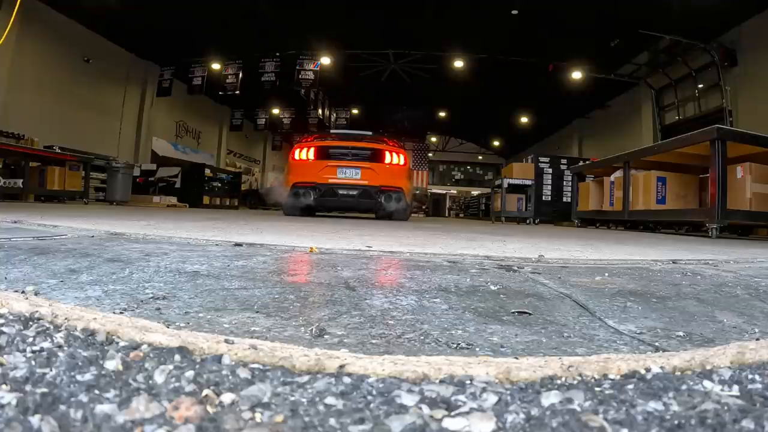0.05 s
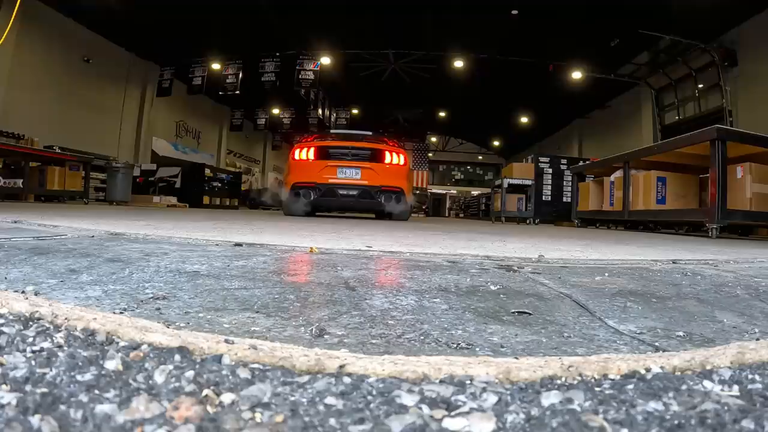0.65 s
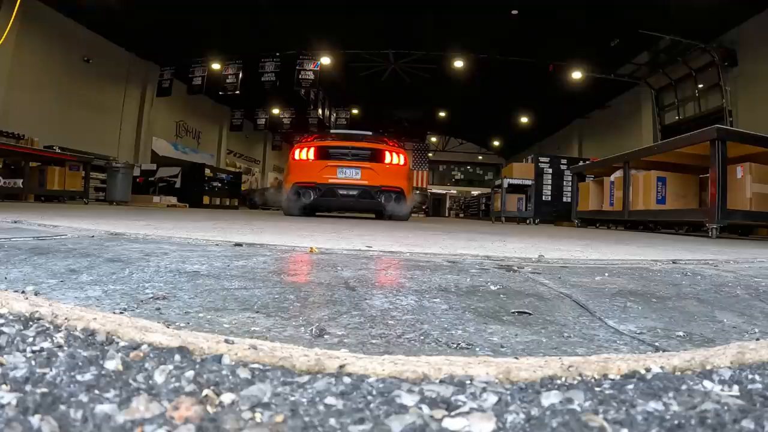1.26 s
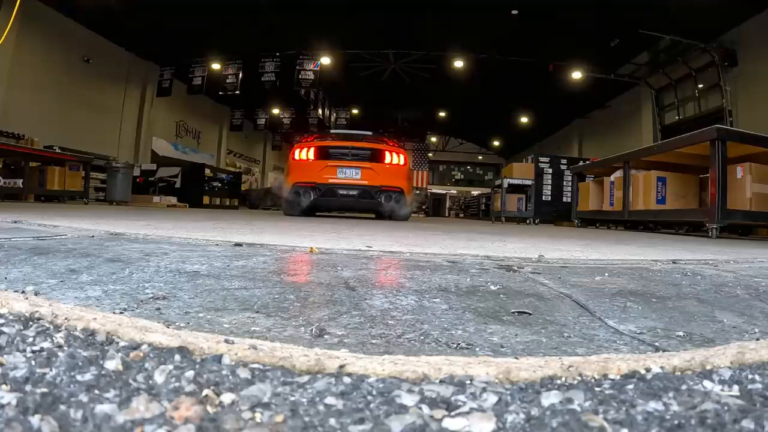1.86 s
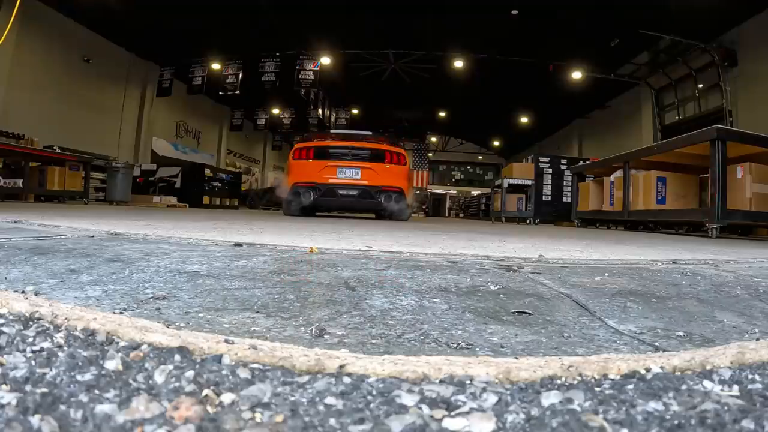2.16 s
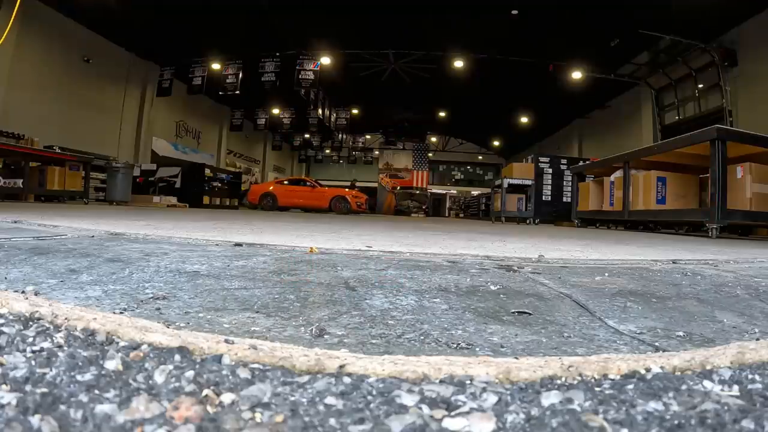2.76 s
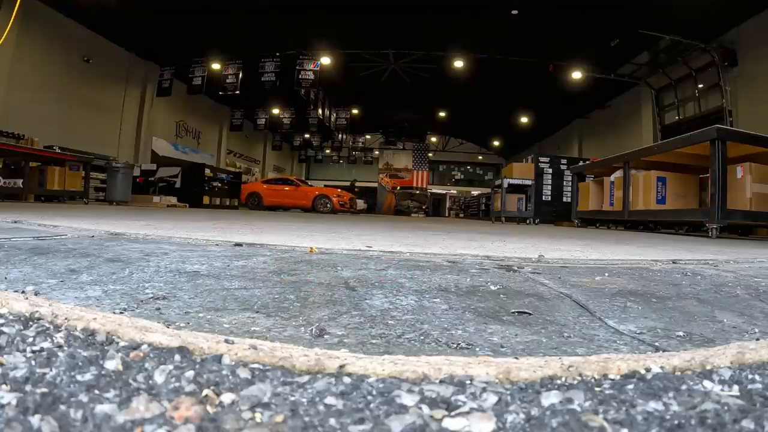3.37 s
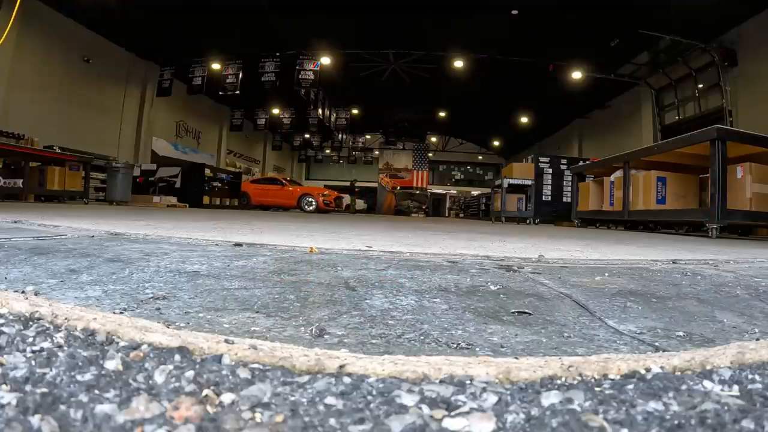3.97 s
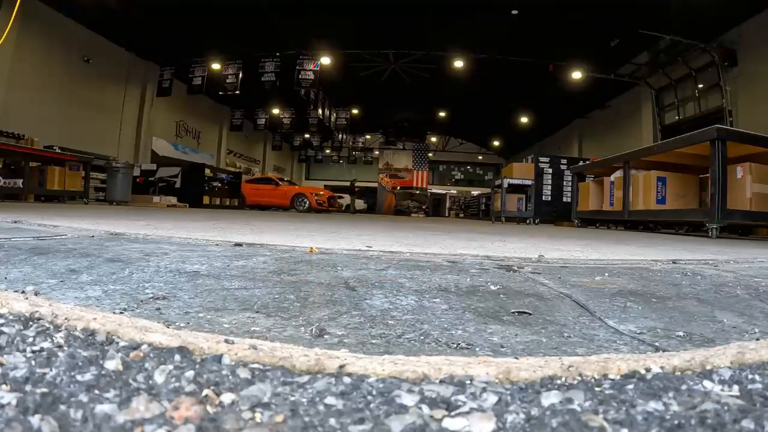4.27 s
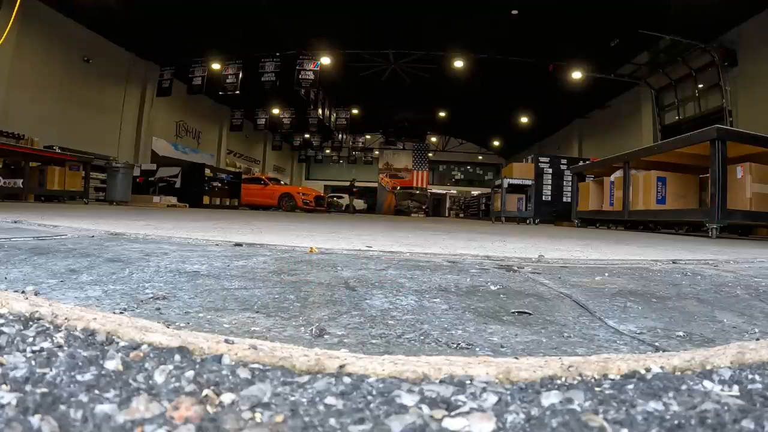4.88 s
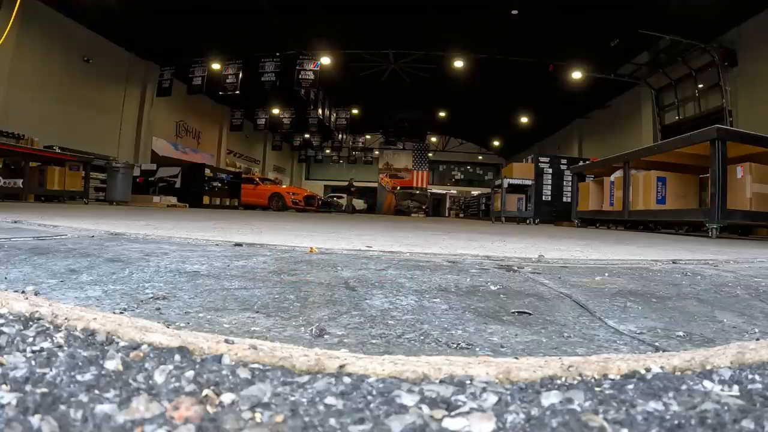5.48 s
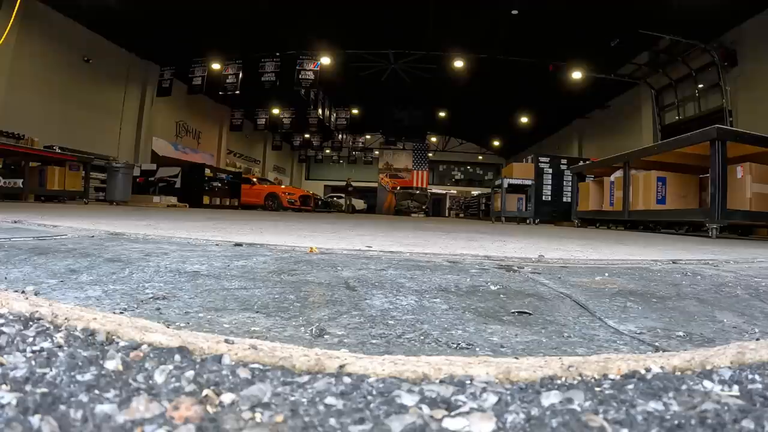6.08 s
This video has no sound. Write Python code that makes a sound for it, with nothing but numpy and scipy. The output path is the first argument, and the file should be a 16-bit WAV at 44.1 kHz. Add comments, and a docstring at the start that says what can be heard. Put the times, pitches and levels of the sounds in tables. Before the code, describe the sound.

Close exhaust pulses and pops from a powerful car give way to distant, echoing engine rumble and faintly squealing tyres.

```python
"""A big V8 car lopes at fast idle in a large workshop hall. First the tailpipes are close: each firing
sends a pressure pulse, a puff of gas and a metallic rasp out of the pipes while the revs settle.
At 2.4 s the scene changes with a click to the car creeping far down the hall: echoes blur the firings
into a rumble, and the tyres stick and slip in soft squeals. At 4.75 s grit cracks under a tyre;
then the revs sag."""
import sys
import numpy as np
from scipy import signal
from scipy.fft import rfft, irfft
from scipy.io import wavfile
from scipy.ndimage import uniform_filter1d, minimum_filter1d

SR = 44100
rng = np.random.default_rng(int(sys.argv[2]) if len(sys.argv) > 2 else 0)


def log_audio(samples):
    """Write samples as a 16-bit WAV file to the path given in sys.argv[1]."""
    # one column per channel
    frames = np.atleast_2d(samples).T
    # limit to full scale, then quantise
    limited = np.clip(frames, -1, 1)
    pcm = np.round(limited * 32767).astype(np.int16)
    wavfile.write(sys.argv[1], SR, pcm)


N = 274743
T = np.arange(N) / SR
FAR_START_S = 2.426


def exhaust(count, pipe, rough, scatter_db, gust_firings):
    """A pressure pulse at every firing, then a dying gust of turbulence, both through the pipes."""
    pulses = np.diff(np.floor(count), prepend=np.floor(count[0]))
    gusts = np.exp(-(count % 1) / gust_firings) * rng.standard_normal(N)
    pressure = blows(count, THUMP, scatter_db) * (unit_rms(pulses) + rough * unit_rms(gusts))
    return unit_rms(colour(pressure, pipe))


# Cylinders in firing order. Each row: thump in dB, gas puff in dB.
CYLINDERS = [(3.5, 5), (2, 1.5), (5, 2), (0, 5), (-7, -3), (-2.5, 2), (5, 1), (0.5, 3.5)]
THUMP, PUFF = 0, 1

def blows(count, column, scatter_db):
    """Strength of the latest firing: its cylinder's own, plus scatter."""
    index = np.floor(count).astype(int)
    scatter = rng.standard_normal(1024)[index % 1024]
    return gain_of(np.array(CYLINDERS)[index % len(CYLINDERS), column] + scatter_db * scatter)


# Engine speed. Each row: time in seconds, firings per second.
NEAR_SPEED = [(0.0, 74.97), (0.25, 72.52), (0.74, 66.21), (1.21, 61.85), (1.66, 61.65), (2.16, 63.85),
              (2.42, 64.15)]
# Firing note in the hall's standing waves. Each row: time in seconds, level in dB.
NEAR_NOTE = [(0.0, -18.5), (0.7, -18.5), (0.79, -29), (0.88, -17), (1.08, -18), (1.22, -36), (1.3, -21),
             (1.9, -21), (2.03, -25), (2.42, -20)]
# Booming orders. Each row: crank order, level in dB.
NEAR_BOOM_ORDERS = [(7, -19), (7.5, -17.5), (8, -11)]
# Boom resonance, pipe and rumble spectra. Each row: frequency in Hz, gain in dB.
NEAR_BOOM_RESPONSE = [(110, -67), (116, -7), (120, -7), (123.5, 2.5), (128, 1), (133, -3), (141, -4.5),
                      (150, -4.5)]
NEAR_PIPE = [(40, -19), (100, 1.5), (150, -2), (225, -11), (320, -9.5), (450, 0.5), (560, -4.5), (700, -6),
             (1170, -7.5), (1350, -15), (1900, -19.5), (2300, -21.5), (2600, -34), (3600, -46),
             (15000, -100)]
NEAR_RUMBLE = [(10, -42), (25, -1), (55, 42), (90, -15), (150, -1), (220, -2), (400, -53)]
# Pipe and hall resonances. Each row: centre in Hz, width in Hz, gain in dB.
NEAR_MODES = [(213, 21, -4), (266, 23, -2), (336, 26, 6), (451, 32, -2), (579, 33, 12.5), (620, 28, -11),
              (690, 14, -13), (819, 37, -4), (875, 16, 1), (2120, 180, -0.5), (2750, 62, 5)]

def near_car():
    """Close tailpipes: boom, throbbing exhaust and a sharp puff of gas at every firing."""
    count = firings(NEAR_SPEED, start_s=0)
    note = gain_of(2) * firing_note(count + .41, [NEAR_NOTE], waver=.02)
    boom = gain_of(-2.5) * booming(count, NEAR_BOOM_ORDERS, NEAR_BOOM_RESPONSE, waver=.056, spread=5.4)
    lines = gain_of(2.2) * near_lines(count)
    rumble = gain_of(-36.5) * noise(NEAR_RUMBLE)
    pipes = exhaust(count - .52, NEAR_PIPE, rough=1, scatter_db=1.3, gust_firings=.93)
    pipes = gain_of(rev_level_db(count, -16.5, db_per_hz=.033)) * unit_rms(ring(pipes, NEAR_MODES))
    roar = gain_of(-9) * hall(pipes, t60_s=.97, wet_db=1)
    gas_gain = gain_of(rev_level_db(count, -43, db_per_hz=-.051))
    mid = note + boom + lines + roar + pops() + rumble + rasp(count) + gas_gain * puffs(count)
    echoes = hall(pipes, t60_s=.42, wet_db=-6.5) - pipes
    return stereo(mid, echoes + gas_gain * puffs(count) + gain_of(-7) * rasp(count))


# Engine speed. Each row: time in seconds, firings per second.
FAR_SPEED = [(2.42, 79.23), (2.7, 77.15), (3.09, 76.83), (3.59, 78.47), (3.89, 77.65), (4.33, 77.44),
             (4.71, 78.98), (4.93, 77.23), (5.47, 65.72), (5.82, 61.66), (6.23, 60.47)]
# Firing note and its octave. Each row: time in seconds, level in dB.
FAR_NOTE = [(2.42, -10), (2.6, -13), (2.74, -35), (3.12, -20.5), (3.39, -28.5), (3.74, -18), (4.11, -24.5),
            (4.76, -14), (5.01, -26), (5.18, -12.5), (5.69, -13.5), (6.0, -27), (6.23, -18)]
FAR_OCTAVE = [(2.42, -27), (2.75, -19.5), (3.9, -21.5), (4.63, -25.5), (4.85, -39), (5.12, -19),
              (5.45, -16), (5.6, -16.5), (6.23, -22.5)]
# Booming orders. Each row: crank order, level in dB.
FAR_BOOM_ORDERS = [(7, -23), (7.5, -23)]
# Boom resonance, pipe and rumble spectra. Each row: frequency in Hz, gain in dB.
FAR_BOOM_RESPONSE = [(112, -9.5), (122, -8), (132, 4.5), (140, -6.5), (148, 2)]
FAR_PIPE = [(40, -20), (100, 1), (145, 1.5), (195, -2.5), (250, 0.5), (310, 3), (410, -0.5), (540, -4.5),
            (640, -5.5), (800, -10), (1100, -12.5), (1400, -16.5), (2100, -32), (3000, -50), (15000, -100)]
FAR_RUMBLE = [(10, -16), (22, -18), (35, 3), (52, 3), (75, 2), (130, -31.5), (400, -82)]
# Pipe and hall resonances. Each row: centre in Hz, width in Hz, gain in dB.
FAR_MODES = [(338, 11, -8.5), (373, 84, -14.5), (433, 12, -0.5), (502, 84, -9), (530, 14, -19)]

def far_car():
    """Far down the hall echoes blur the firings; tyre hiss and squeal lie on top."""
    count = firings(FAR_SPEED, FAR_START_S)
    exhaust_db = rev_level_db(count, -21.5, db_per_hz=.2)
    swing_db = 1.04 * bump(middle_s=3.4, length_s=1.7)  # the car swings round
    load_db = exhaust_db - exhaust_db[T > FAR_START_S].mean() + swing_db
    note = gain_of(-.06) * firing_note(count, [FAR_NOTE, FAR_OCTAVE], waver=.06)
    boom = gain_of(-1.8) * booming(count, FAR_BOOM_ORDERS, FAR_BOOM_RESPONSE, waver=.07, spread=1.5)
    lines = gain_of(load_db - 1.5) * far_lines(count)
    pipes = ring(exhaust(count - .4, FAR_PIPE, rough=2.42, scatter_db=.25, gust_firings=.79), FAR_MODES)
    rumble = gain_of(-27) * noise(FAR_RUMBLE)

    def wash():
        """A fresh diffuse mix of exhaust echoes and tyres."""
        roar = gain_of(exhaust_db) * unit_rms(hall(pipes, t60_s=1.57, wet_db=6.5))
        return roar + tyre_hiss(count) + tyre_squeal()
    return stereo(note + boom + lines + singing(count) + rumble + wash(), gain_of(-1) * wash())


def firing_note(count, tables, waver):
    """The firing rate (crank order 4) and its multiples, each on its level curve."""
    orders = 4 * np.arange(1, len(tables) + 1)
    return drone(count, orders, [curve(rows) for rows in tables], waver, np.zeros(len(orders)))


def booming(count, table, response, waver, spread):
    """Low orders boom as they slide into a resonance; spread phases (radians) soften the beat."""
    orders, own_db = np.transpose(table)
    rate_hz = firing_hz(count)
    levels_db = [db + np.interp(k * rate_hz / 4, *np.transpose(response)) for k, db in table]
    return drone(count, orders, levels_db, waver, spread * (orders - 8) ** 2)


# Exhaust lines. Each row: crank order, idle level in dB, raised-rev level in dB.
NEAR_ORDERS = [(3.0, -45.0, -26.0), (3.5, -37.0, -40.0), (4.5, -37.0, -33.0), (5.0, -38.0, -30.0),
               (6.5, -46.0, -37.0), (8.5, -40.0, -33.0), (9.0, -33.0, -29.0), (9.5, -31.0, -36.0),
               (10.0, -34.0, -48.0), (10.5, -38.0, -32.0), (11.0, -44.0, -28.0), (11.5, -39.0, -33.0),
               (12.0, -30.0, -31.0), (12.5, -45.0, -37.0), (13.0, -38.0, -43.0), (13.5, -42.0, -32.0),
               (14.0, -37.0, -31.0), (14.5, -51.0, -33.0), (15.0, -43.0, -35.0), (15.5, -33.0, -39.0),
               (16.0, -28.0, -29.0), (16.5, -42.0, -41.0), (17.0, -43.0, -33.0), (17.5, -44.0, -37.0),
               (18.0, -40.0, -38.0), (18.5, -40.0, -28.0), (19.0, -35.0, -28.0), (19.5, -37.0, -35.0),
               (20.0, -25.0, -26.0), (20.5, -36.0, -36.0), (21.0, -36.0, -36.0), (21.5, -37.0, -42.0),
               (22.0, -37.0, -31.0), (22.5, -32.0, -38.0), (23.0, -42.0, -28.0), (23.5, -34.0, -34.0),
               (24.0, -30.0, -31.0), (24.5, -41.0, -30.0), (25.0, -47.0, -31.0), (25.5, -43.0, -29.0),
               (26.0, -36.0, -33.0), (26.5, -37.0, -29.0), (27.0, -36.0, -43.0), (27.5, -29.0, -36.0),
               (28.0, -40.0, -37.0), (28.5, -29.0, -38.0), (29.0, -34.0, -43.0), (29.5, -44.0, -38.0),
               (30.0, -41.0, -36.0), (30.5, -40.0, -37.0), (31.0, -35.0, -38.0), (31.5, -37.0, -44.0),
               (32.0, -37.0, -40.0), (32.5, -39.0, -40.0), (35.0, -40.0, -47.0), (35.5, -34.0, -41.0),
               (36.0, -32.0, -46.0), (37.0, -37.0, -45.0), (37.5, -50.0, -41.0), (38.5, -43.0, -46.0),
               (39.0, -42.0, -46.0), (39.5, -38.0, -49.0), (40.0, -38.0, -45.0), (40.5, -51.0, -41.0),
               (41.5, -51.0, -40.0), (42.5, -42.0, -44.0), (43.0, -48.0, -44.0), (43.5, -41.0, -48.0),
               (45.0, -53.0, -43.0), (45.5, -55.0, -44.0), (46.5, -45.0, -52.0), (49.0, -46.0, -54.0),
               (51.5, -43.0, -52.0), (53.0, -45.0, -49.0)]

def near_lines(count, steady_hz=62.2, blend_hz=(63, 69), growth_db_per_hz=.7, growth_top_hz=64):
    """Firm exhaust drone: the same crests every engine cycle, changing colour with the revs."""
    orders, idle_db, raised_db = np.transpose(NEAR_ORDERS)
    rate_hz = firing_hz(count)
    revved = np.interp(rate_hz, blend_hz, [0, 1])
    growth_db = growth_db_per_hz * (np.minimum(rate_hz, growth_top_hz) - steady_hz)
    idling_db = sliding_db(rate_hz, orders, idle_db, NEAR_PIPE, NEAR_MODES, steady_hz)
    levels_db = ((1 - revved) * (idle + growth_db) + revved * raised
                 for idle, raised in zip(idling_db, raised_db))
    return drone(count, orders, levels_db, waver=.07, phases=lope(orders, (idle_db + raised_db) / 2))


def lope(orders, line_db, throb=.45, crest_firings=.11, crest_floor=.45):
    """Phases that gather the orders into two pressure crests a firing, higher on strong cylinders."""
    count = np.arange(1024) / 128 + PHASE_ORIGIN_FIRINGS  # one engine cycle
    crests = np.exp(-(((count - 2.45) % .5 - .25) / crest_firings) ** 2)
    envelope = (crest_floor + crests) * blows(count - .5, THUMP, scatter_db=0) ** throb
    bins, lines = np.rint(2 * orders).astype(int), np.zeros(513, complex)
    cycle = envelope * crests ** 4 + .3 * rng.standard_normal(len(count))
    for _ in range(30):  # impose line levels and envelope in turn
        phases = np.angle(rfft(cycle)[bins])
        lines[bins] = gain_of(line_db) * np.exp(1j * phases)
        cycle = envelope * np.cos(np.angle(signal.hilbert(irfft(lines))))
    return phases


# Exhaust lines. Each row: crank order, level in dB.
FAR_ORDERS = [(2, -35), (2.5, -33), (3, -38), (3.5, -36), (5, -34), (5.5, -38), (6, -38), (6.5, -37),
              (9, -40), (10.5, -35), (11, -37), (12, -39), (12.5, -29), (13, -38), (13.5, -28), (14, -32.5),
              (14.5, -35), (15, -35), (15.5, -36), (17, -37), (18, -36), (18.5, -33.5), (19, -38),
              (20, -38), (20.5, -37), (21, -33.5), (22, -38), (23, -35.5), (24, -40), (25, -39),
              (25.5, -36), (26, -40), (27, -39), (28, -36), (30, -42), (34, -42)]

def far_lines(count, steady_hz=77.8):
    """Distant exhaust drone; echoes smear it while the revs change."""
    orders, line_db = np.transpose(FAR_ORDERS)
    rate_hz = firing_hz(count)
    glide_hz_per_s = abs(np.gradient(uniform_filter1d(rate_hz, SR // 4))) * SR
    smear = .042 * glide_hz_per_s
    levels_db = sliding_db(rate_hz, orders, line_db, FAR_PIPE, FAR_MODES, steady_hz)
    return drone(count, orders, levels_db, waver=.13 + smear) / (1 + smear)


def sliding_db(rate_hz, orders, line_db, pipe, modes, steady_hz):
    """Orders swell and fade as they slide through the pipe's resonances."""
    f = np.arange(1500.)
    ringing = 1 + sum(gain_of(db) / (1 + 2j * (f - hz) / width) for hz, width, db in modes)
    pipe_db = np.interp(f, *np.transpose(pipe)) + 20 * np.log10(abs(ringing))
    return (db + np.interp(k * rate_hz / 4, f, pipe_db) - np.interp(k * steady_hz / 4, f, pipe_db)
            for k, db in zip(orders, line_db))


# Swells, keyed by crank order. Each row: middle in seconds, length in seconds, level in dB.
SINGING_ORDERS = {2.5: [(3.05, .7, -26)], 8.5: [(5.45, .25, -24)], 9: [(5.95, .5, -31)],
                  13: [(4.92, .3, -27)], 14.5: [(5.25, .3, -25)], 15.5: [(5.5, .2, -26)],
                  16: [(2.62, .3, -23), (3.3, .65, -23), (4.27, .5, -22), (5.18, .25, -29)],
                  17.5: [(3.55, .25, -27), (4.05, .7, -20), (4.68, .2, -26)], 19.5: [(2.7, .3, -27),
                  (3.3, .35, -26), (4.65, .3, -25)], 20: [(5.82, .3, -24)], 20.5: [(4.66, .38, -22.5)],
                  21: [(2.68, .25, -26), (3.95, .3, -29), (6.0, .4, -34)], 22.5: [(3.58, .2, -24),
                  (4.25, .4, -23.5)], 28.5: [(5.48, .18, -23), (5.85, .3, -29)], 32.5: [(5.85, .35, -31)],
                  35.5: [(6.1, .35, -30)]}

def singing(count):
    """Single orders sing out as the car creeps through the hall's standing waves."""
    orders = sorted(SINGING_ORDERS)
    levels_db = [20 * np.log10(swells(SINGING_ORDERS[k]) + 1e-6) for k in orders]
    return drone(count, orders, levels_db, waver=.08)


PHASE_ORIGIN_FIRINGS = 2.7

def drone(count, orders, levels_db, waver, phases=None):
    """Wavering crank orders; by default loosely in step with the strongest cylinder."""
    turns = (count - PHASE_ORIGIN_FIRINGS) / 4
    knots_s = np.arange(0, T[-1] + .1, .1)
    if phases is None:
        phases = rng.uniform(-2.3, 2.3, len(orders))
    out = np.zeros(N)
    for order, db, phase in zip(orders, levels_db, phases):
        swell, drift = (waver * np.interp(T, knots_s, v) for v in rng.standard_normal((2, len(knots_s))))
        out += gain_of(db) * (1 + swell) * np.cos(2 * np.pi * order * turns + 2 * drift + phase)
    return np.sqrt(2) * out


# Hard thumps. Each row: start in seconds, peak in dB.
POPS = [(.0815, -8), (.148, -12), (.296, -12), (.412, -17), (.474, -13), (.5945, -6), (.7135, -6),
        (.8345, -6), (.896, -11), (.9575, -7), (1.0845, -14), (2.1105, -14), (2.238, -14), (2.363, -14)]
# Thump spectrum. Each row: frequency in Hz, gain in dB.
POP_COLOUR = [(100, -25), (250, -7), (450, -1), (850, -4), (1150, -9), (1400, -22), (2200, -29),
              (3500, -46), (15000, -100)]

def pops():
    """Some firings crack harder out of the tailpipes: one short pressure pulse each."""
    kicks = np.zeros(N)
    for start_s, db in POPS:
        kicks[round(start_s * SR)] = gain_of(db)
    return colour(kicks, POP_COLOUR) / colour(1. * (T == 0), POP_COLOUR).max()


# Gas hiss spectrum. Each row: frequency in Hz, gain in dB.
PUFF_COLOUR = [(1500, -4), (3000, 0), (4200, -1), (5700, -3), (7300, -8), (9600, -7), (12300, -14),
               (13500, -27), (15000, -43)]

def puffs(count, lag_firings=.58):
    """Gas hisses out at every firing; a weaker reflection follows, over a steady hiss."""
    age = (count - lag_firings) % 1
    strength = blows(count - lag_firings, PUFF, scatter_db=2)
    puff = strength * (1 - np.exp(-age / .064)) * np.exp(-age / .15)
    reflection = .37 * np.roll(puff, round(.0054 * SR))
    envelope = np.sqrt(puff ** 2 + reflection ** 2 + .14 ** 2)
    return noise(PUFF_COLOUR, envelope)


# Tailpipe rasp and its harder spits. Each row: time in seconds, level in dB.
RASP_LEVEL = [(0, -41.5), (.3, -39), (.75, -39), (1.2, -45.5), (1.38, -39), (1.75, -39.5), (2.1, -40),
              (2.4, -34.5)]
SPITS = [(.266, -33), (.417, -32), (1.357, -33), (1.481, -33), (1.612, -27), (1.632, -34), (1.997, -26),
         (2.317, -34)]
# Rasp spectrum. Each row: frequency in Hz, gain in dB.
RASP_COLOUR = [(1100, -22.5), (1500, -5.5), (1900, -1), (2200, 0.5), (2480, -11.5), (2750, -2.5),
               (3100, -25), (6000, -37)]

def rasp(count, lag_firings=.475, spit_decay_s=.013):
    """A metallic rasp rides on every firing and sometimes spits harder."""
    age = (count - lag_firings) % 1
    strength = blows(count - lag_firings, PUFF, scatter_db=1.2)
    bursts = strength * (1 - np.exp(-age / .014)) * np.exp(-age / .6)
    buzz = gain_of(curve(RASP_LEVEL)) * unit_rms(bursts)
    spits = sum(gain_of(db) * decay(start_s, spit_decay_s) for start_s, db in SPITS)
    return np.hypot(buzz, spits) * noise(RASP_COLOUR)


# Squeals. Each row: middle in seconds, length in seconds, level in dB.
SQUEALS = [(2.513, 0.53, -28), (3.262, 0.094, -29), (3.547, 0.37, -30.5), (3.964, 0.082, -32),
           (4.74, 0.22, -33.5), (5.345, 0.19, -30.5), (5.593, 0.31, -31.5)]
# Tyre whine spectrum. Each row: frequency in Hz, gain in dB.
WHINE = [(600, -60.5), (860, 6), (950, 6), (1020, 0), (1120, 4), (1250, -38), (1700, -51)]

def tyre_squeal(pitch_hz=960, scrub_db=-31):
    """Turning rubber sticks and slips on the smooth floor: a noisy whine and a hall-smeared note."""
    squeal = swells(SQUEALS)
    whine = np.hypot(gain_of(scrub_db), squeal) * gain_of(-2.9 + .46 * wander(11)) * noise(WHINE)
    hz = pitch_hz * (1 + .03 * wander(12.5))
    note = hall(np.sin(2 * np.pi * np.cumsum(hz) / SR), t60_s=.75, wet_db=-6)
    return whine + gain_of(-3.5) * squeal * unit_rms(note)


# Tyre hiss spectrum. Each row: frequency in Hz, gain in dB.
TYRE_HISS = [(1000, 0.5), (2000, 7), (2900, -0.5), (3600, -0.5), (5000, -3), (7000, -8.5), (9000, -16.5),
             (12000, -22), (13500, -39), (15000, -57)]
# Hall resonances. Each row: centre in Hz, width in Hz, gain in dB.
HISS_MODES = [(3530, 31, 0.5), (3970, 150, -7)]
# Hiss spurts. Each row: middle in seconds, length in seconds, rise in dB.
SPURTS = [(3.335, 0.044, 4), (3.552, 0.44, 1)]

def tyre_hiss(count):
    """Tyre hiss follows the revs, swells as the car swings round and rings in the hall."""
    swing_db = 4 * bump(middle_s=2.62, length_s=.23)
    spurts_db = sum(db * bump(middle_s, length_s) for middle_s, length_s, db in SPURTS)
    level_db = rev_level_db(count, -40, db_per_hz=.21) + swing_db + spurts_db
    return gain_of(level_db) * unit_rms(ring(noise(TYRE_HISS), HISS_MODES))


# Grit snaps. Each row: start in seconds, level in dB.
SNAPS = [(4.7512, -26), (4.7624, -18), (4.7678, -20), (4.769, -10.5), (4.772, -13), (4.7741, -21),
         (4.7771, -19), (4.779, -24), (4.8058, -22)]
# Snap spectrum. Each row: frequency in Hz, gain in dB.
GRIT = [(500, 3), (1500, 9), (2100, 10), (3000, 8.5), (4700, 9), (8000, -1.5), (12500, -21), (14500, -51)]

def grit():
    """A stone cracks under the rolling tyre in a quick run of snaps."""
    snaps = np.zeros(N)
    for start_s, db in SNAPS:
        snap = noise(GRIT, decay(start_s, decay_s=.0009))
        snaps += gain_of(db) * snap / abs(snap).max()
    return stereo(hall(snaps, t60_s=.39, wet_db=-7), hall(snaps, t60_s=.6, wet_db=-8) - snaps)


def hall(x, t60_s, wet_db):
    """Direct sound plus a dense tail of echoes."""
    t = T[:SR]
    tail = rng.standard_normal(SR) * (rng.random(SR) < .05) * gain_of(-60 * t / t60_s) * (t > .004)
    return x + gain_of(wet_db) * signal.oaconvolve(x, tail / np.linalg.norm(tail))[:N]


# Side signal spectrum. Each row: frequency in Hz, gain in dB.
SPREAD = [(60, -18), (200, -31.5), (380, -22.5), (700, -14), (1300, -13), (2400, -6), (4400, -9),
          (8000, -6.5), (15000, -4)]

def stereo(mid, diffuse):
    """Diffuse sound differs between left and right, mostly in the treble."""
    side = colour(diffuse, SPREAD)
    return np.array([mid + side, mid - side])


def firings(speed, start_s):
    """Firings since start_s: eight per engine cycle, four per crank turn."""
    count = np.cumsum(curve(speed)) / SR
    return count - count[round(start_s * SR)]


def firing_hz(count):
    return np.gradient(count) * SR


def rev_level_db(count, idle_db, db_per_hz, idle_hz=62):
    return idle_db + db_per_hz * (firing_hz(count) - idle_hz)


def ring(x, modes):
    """Adds narrow resonances."""
    return x + sum(gain_of(db) * signal.lfilter(*signal.iirpeak(hz, hz / width, SR), x)
                   for hz, width, db in modes)


def colour(x, spectrum, size=8192):
    """Minimum-phase filter."""
    hz, db = np.transpose(spectrum)
    log_hz = np.log(abs(np.fft.fftfreq(size, 1 / SR)) + 1)
    log_gain = np.interp(log_hz, np.log(hz), db) * np.log(10) / 20
    taps = np.fft.ifft(np.exp(signal.hilbert(log_gain).conj())).real[:size // 2]
    return signal.oaconvolve(x, taps)[:N]


def noise(spectrum, envelope=1):
    return unit_rms(colour(envelope * rng.standard_normal(N), spectrum))


def wander(hz):
    """Slow random drift."""
    f = np.fft.rfftfreq(N, 1 / SR)
    return unit_rms(irfft(rfft(rng.standard_normal(N)) * np.exp(-(f / hz) ** 2), N))


def swells(rows):
    return sum(gain_of(db) * bump(middle_s, length_s) for middle_s, length_s, db in rows)


def bump(middle_s, length_s):
    return np.exp(-(2 * (T - middle_s) / length_s) ** 2)


def decay(start_s, decay_s):
    return (T >= start_s) * np.exp(-abs(T - start_s) / decay_s)


def curve(rows):
    return np.interp(T, *np.transpose(rows))


def gain_of(db):
    return 10 ** (np.asarray(db) / 20)


def unit_rms(x):
    return x / np.sqrt(np.mean(x ** 2) + 1e-20)


def scene():
    """The near car gives way to the far one in 1 ms, with a click."""
    far = np.clip((T - FAR_START_S) * 1000, 0, 1)
    click = gain_of(-3.5) * decay(FAR_START_S, decay_s=.00041)
    return (1 - far) * near_car() + far * far_car() + grit() - click


def record(dry):
    """Channel tone, the left a little brighter; then a peak limiter and a 15.7 kHz low-pass."""
    left = colour(dry[0], [(150, .04), (500, -2), (2000, -2), (7000, -2), (13000, -1)])
    right = colour(dry[1], [(150, .15), (500, -.81), (2000, -1.2), (7000, -3), (13000, -5)])
    limit_gain = .98 / np.maximum(np.maximum(abs(left), abs(right)), .98)
    limited = np.array([left, right]) * uniform_filter1d(minimum_filter1d(limit_gain, 241), 241)
    low_pass = signal.firwin(511, 15700, window=("kaiser", 9), fs=SR)
    return signal.oaconvolve(limited, low_pass[None], "same")


dry = scene()
out = record(dry)
log_audio(out)
```